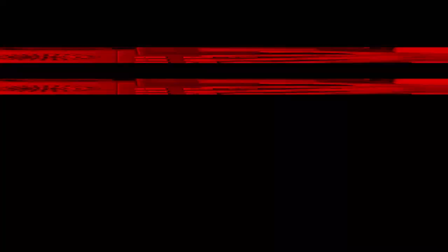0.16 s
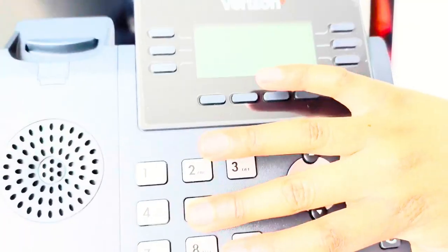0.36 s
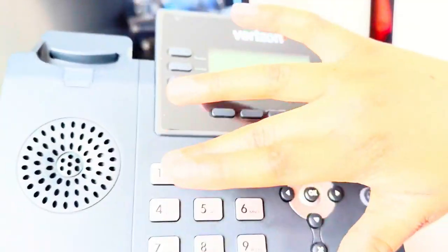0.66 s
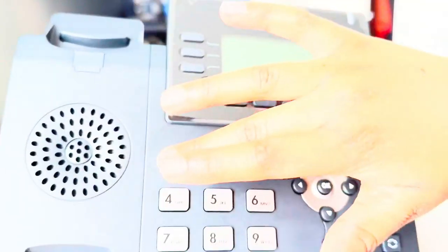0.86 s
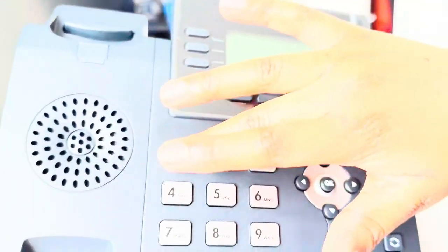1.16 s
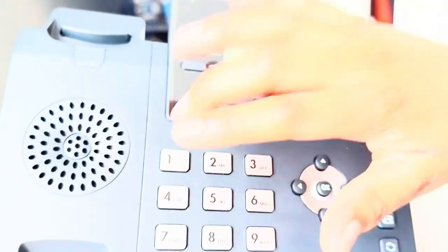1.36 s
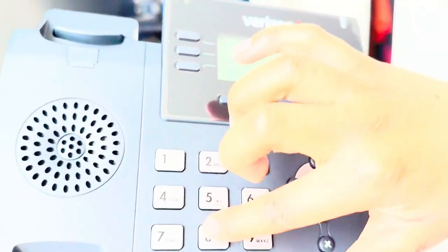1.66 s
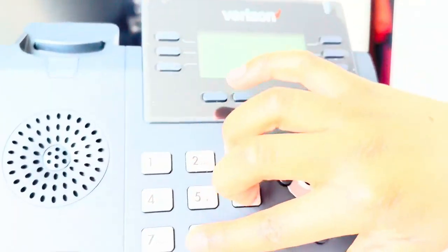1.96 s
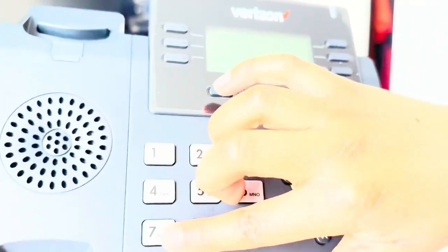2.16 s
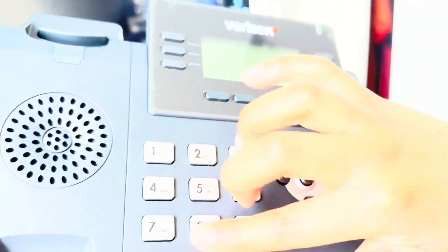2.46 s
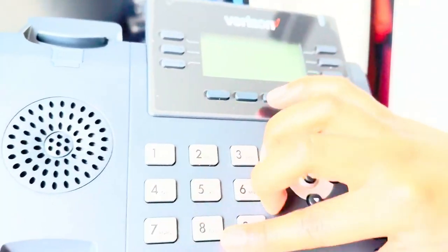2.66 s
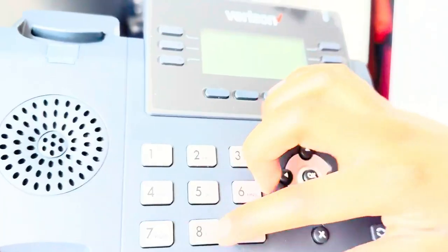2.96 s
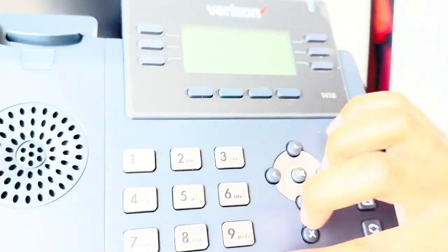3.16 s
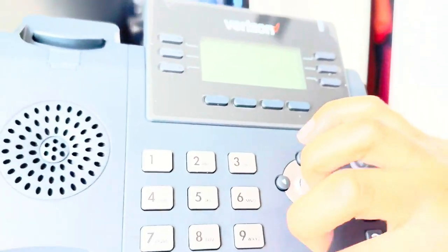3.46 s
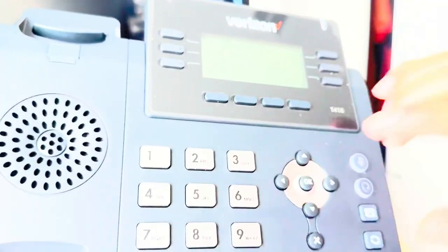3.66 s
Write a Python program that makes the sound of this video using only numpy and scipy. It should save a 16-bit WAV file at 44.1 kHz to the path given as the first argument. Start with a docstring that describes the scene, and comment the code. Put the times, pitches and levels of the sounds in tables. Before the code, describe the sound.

Close stereo pickup of phone buttons clicking irregularly indoors, hollow presses mixed with crisp releases and faint ticks; after a quieter gap, a stiff key clacks loudly and only low background noise remains.

```python
"""In a small room, plastic keys of a desk phone are pressed and let go close to the microphones.
A press is a dull knock: damped modes of a key cap and the hollow case, reversed as the key hits its stop.
A release is a bright snap: a short scrape, then filtered noise bursts with the key's own modes.
Near the end one stiff key clacks loudly. Faint ticks, soft low thuds and the rub of fingertips come between,
and faint noise with a drifting midrange lies underneath with mains hum."""
import sys
import numpy as np
from scipy import signal
from scipy.fft import rfft, irfft
from scipy.io import wavfile

SR = 44100
rng = np.random.default_rng(int(sys.argv[2]) if len(sys.argv) > 2 else 0)


def unload_wav(signal):
    """Save mono or channel-first audio to the path in sys.argv[1] as 16-bit WAV at rate SR, clipped to [-1, 1]."""
    wavfile.write(
        sys.argv[1],
        SR,
        np.round(np.clip(np.atleast_2d(signal).T, -1, 1) * 32767).astype(np.int16),
    )


N = 167580
T = np.arange(int(0.25 * SR)) / SR  # time axis of one short sound [s]
RISE_S, PRESS_RISE_S, CASE_RISE_S = 0.00059, 0.00019, 0.0039


def amp(db):
    """Logarithmic level: decibels to an amplitude gain."""
    return 10 ** (np.asarray(db) / 20)


def read(points, hz):
    """Logarithmic pitch: a curve's value at hz, interpolated over log frequency."""
    f, value = np.transpose(points)
    return np.interp(np.log(hz + 1), np.log(f + 1), value)


def sides(db):
    """Interchannel level difference: left and right gains that share it equally."""
    return amp(np.array([[0.5], [-0.5]]) * db)


def unit(x):
    """Energy normalisation: scales a short sound to the energy of 10 ms at level 1."""
    energy = np.sum(x ** 2, -1, keepdims=True)
    return x / np.sqrt(energy / (SR / 100) + 1e-20)


def add(mix, s, sound):
    """Superposition: mixes a sound in at time s."""
    part = mix[:, max(round(s * SR), 0):][:, :sound.shape[1]]
    part += sound[:, :part.shape[1]]


def coloured(x, points):
    """Linear filtering: weights the spectrum by a (frequency [Hz], level [dB]) curve."""
    return irfft(rfft(x) * amp(read(points, np.fft.rfftfreq(N, 1 / SR))), N)


def mode(hz, t60, rise, lag):
    """Damped resonance: a decaying sine whose right side lags in phase [rad]."""
    envelope = (1 - np.exp(-T / rise)) * amp(-60 * T / t60)
    return envelope * np.sin(2 * np.pi * hz * T - np.array([[0], [lag]]))


# Spectrum of the background noise, relative: (frequency [Hz], density [dB per Hz])
HISS_SPECTRUM = [(15, -45), (25, -13.5), (59, -2), (92, -3), (123, -4.5), (170, -3), (489, -11), (962, -19),
                 (1400, -12.5), (2610, -11), (3920, -17), (6900, -9), (8000, -22.5), (9300, -33.5),
                 (11500, -38), (14500, -38.5), (16000, -47)]
# Its balance: (frequency [Hz], left-right difference [dB])
HISS_BALANCE = [(60, -0.5), (180, -0.5), (550, -1.5), (1650, -1), (4970, 14.5), (15000, 2)]
# Its likeness between the sides: (frequency [Hz], correlation [0-1])
HISS_LIKENESS = [(60, 0.72), (300, 0.75), (1500, 0.11), (6000, 0.071)]
# Drift of the background's midrange: (time [s], relative level [dB])
MIDRANGE_DRIFT = [(0, 16), (.25, 1.5), (0.579, 3.5), (0.679, -4.5), (0.95, 7), (1.339, 10.5), (1.459, -6),
                  (1.88, 6), (2.031, -6), (2.251, 6), (2.38, -18.5), (2.66, -0.5), (2.919, 0), (3.08, -13),
                  (3.299, 0.5), (3.751, 3)]
HISS_DB, HUM_DB, HUM_HZ = -66.5, -81.5, 120  # both levels are RMS
RUMBLE_HZ, RUMBLE_SHARE = 89.2, 0.79  # mainly below this pitch, rumble follows a share of the drift


def background(mid_hz=800, mid_octaves=0.94):
    """Partly coherent noise: hiss and room rumble with a drifting midrange, plus mains hum."""
    frames, hz = N // 512 + 5, np.fft.rfftfreq(2048, 1 / SR)
    a, b, c, d = rng.standard_normal((frames, len(hz), 4)).T
    left, other = a + 1j * b, c + 1j * d
    same = read(HISS_LIKENESS, hz)[:, None]
    z = np.array([left, same * left + np.sqrt(1 - same ** 2) * other])

    drift = np.interp(np.arange(frames) * 512 / SR, *np.transpose(MIDRANGE_DRIFT))
    share = np.exp(-0.5 * (np.log2((hz + 1) / mid_hz) / mid_octaves) ** 2)
    share += RUMBLE_SHARE / (1 + (hz / RUMBLE_HZ) ** 2)
    z *= amp(read(HISS_SPECTRUM, hz)[:, None] + share[:, None] * drift)
    z *= sides(read(HISS_BALANCE, hz))[:, :, None]
    hiss = signal.istft(z, nperseg=2048, noverlap=1536)[1][:, :N]
    hum = np.sqrt(2) * np.sin(2 * np.pi * HUM_HZ * np.arange(N) / SR)
    return amp(HISS_DB) * hiss / hiss.std() + amp(HUM_DB) * hum


# Edges of six noise bands: (frequency [Hz])
BAND_EDGES = [400, 700, 1400, 2800, 5600, 10000, 16500]
# Per band: (time to die by 60 dB [s])
BAND_DECAY = [0.22, 0.077, 0.037, 0.017, 0.017, 0.0053]
# Per band: (left-right difference added to the sound's own [dB])
BAND_BALANCE = [4, -0.5, 0.5, 3.5, 5, -6.5]
# Per band: (left-right correlation before filtering [0-1])
BAND_LIKENESS = [0.95, 0.45, 0.44, 0.51, 0.59, 0.16]


def plastic(levels_db, rise, pan_db):
    """High modal density: many damped modes of plastic parts merge into noise, band by band."""
    out = 0
    for k, db in enumerate(levels_db):
        common, *separate = rng.standard_normal((3, len(T)))
        same = BAND_LIKENESS[k]
        noise = np.sqrt(same) * common + np.sqrt(1 - same) * np.array(separate)
        burst = noise * np.minimum(T / rise, 1) ** 2 * amp(-60 * T / BAND_DECAY[k])
        band = signal.butter(3, BAND_EDGES[k:k + 2], "band", fs=SR, output="sos")
        out = out + amp(db) * unit(signal.sosfilt(band, burst)) * sides(pan_db + BAND_BALANCE[k])
    return out


# Faint ticks; the first is the end of a click already sounding at the start:
# (time [s], level before the band colour [dB])
FAINT_TICKS = [(.003, -60), (1.932, -63.5), (2.288, -67), (2.595, -59), (3.156, -75.5), (3.251, -66.5)]
# Colour of a faint tick, per band: (level [dB])
TICK_COLOUR = [-8, -5, 1, -10, -30.5, -31]


def faint_tick(db):
    """Banded noise burst: a faint tick of plastic with a slow rise and little treble."""
    return plastic(db + np.array(TICK_COLOUR), 0.0031, 2)


# How well the phone's shell radiates: (frequency [Hz], level [dB])
SHELL_RADIATION = [(320, -7.5), (500, 0.5), (820, -2.5), (1000, -1), (1230, 4.5), (1480, -2.5), (1900, 0.5),
                   (2550, -6), (3100, -1.5), (4200, -5), (7000, 0)]


def shell(x):
    """Radiation efficiency: the shell passes some pitches to the air better than others."""
    return coloured(x, SHELL_RADIATION)


# Reverberation time of the room: (frequency [Hz], time to die by 60 dB [s])
ROOM_DECAY = [(250, 0.5), (550, 0.5), (1200, 0.41), (3000, 0.4), (7000, 0.39), (15000, 0.27)]
# Colour of the room: (frequency [Hz], level [dB])
ROOM_COLOUR = [(250, -3.5), (450, -16.5), (640, -12.5), (1200, -9.5), (3000, -6.5), (7000, -5.5),
               (11000, -13), (14000, -16.5)]


def room(x, delay_s=0.00038, build_s=0.003):
    """Diffuse reverberation: dense reflections of random phase, each pitch dying at its own speed."""
    t = np.arange(SR // 2) / SR
    hz, at, z = signal.stft(rng.standard_normal((2, len(t))), SR, nperseg=512)
    t60 = read(ROOM_DECAY, hz)[:, None]
    z = z / abs(z) * z.std()  # keep only the random phases
    z = z * amp(read(ROOM_COLOUR, hz)[:, None] - 60 * at / t60)
    z = z * np.sqrt(2 * np.log(1000) / (t60 * SR))  # equal energy whatever the decay
    tail = signal.istft(z, SR, nperseg=512)[1][:, :len(t)]
    tail = tail * np.clip((t - delay_s) / build_s, 0, 1)
    return signal.fftconvolve(x, tail, axes=1)[:, :N]


# Modes of the hollow case: (pitch ratio to the case pitch [1], relative level [dB],
# time to die by 60 dB [s], phase lag of the right side [rad])
CASE_MODES = [(0.93, -6, 0.026, 1), (1.02, -0.5, 0.018, .5), (1.419, -11, 0.025, 1)]


def case(hz):
    """Modal superposition: the hollow case rings in a few modes after a blow."""
    return unit(sum(amp(db) * mode(hz * ratio, t60, CASE_RISE_S, lag)
                    for ratio, db, t60, lag in CASE_MODES))


HOLLOW_HZ, HOLLOW_WIDTH = 537, 0.091  # centre, and half-width as a share of it
HOLLOW_T60, HOLLOW_RISE_S = 0.34, 0.006


def hollow(db):
    """Modal clustering: many close low modes linger together after a knock into the case."""
    noise = rng.standard_normal(len(T))
    burst = noise * (1 - np.exp(-T / HOLLOW_RISE_S)) * amp(-60 * T / HOLLOW_T60)
    edges = [HOLLOW_HZ / (1 + HOLLOW_WIDTH), HOLLOW_HZ * (1 + HOLLOW_WIDTH)]
    band = signal.butter(2, edges, "band", fs=SR, output="sos")
    return amp(db) * unit(signal.sosfilt(band, burst))


# Soft presses: (time [s], reference level of case and hollow ring [dB], case pitch [Hz], key pitch [Hz],
# key knock [dB], reference level of the edge [dB], reference level of the tick [dB])
KEY_PRESSES = [(0.1094, -37.5, 513, 950, -44, -60.5, -82), (0.7813, -42, 542, 887, -39, -57.5, -53.5),
               (1.06, -41, 540, 930, -40, -50, -46), (1.7032, -39, 521, 793, -42, -59, -49),
               (2.1180, -42.5, 519, 860, -46, -72, -66), (3.27, -52, 544, 883, -54, -65, -53)]
# Modes of a key cap knocked through its rubber dome:
# (pitch ratio to the key pitch [1], relative level [dB], time to die by 60 dB [s])
KNOCK_MODES = [(1, 22.5, 0.010), (1.27, -8.5, 0.0075)]
BOTTOM_S, BOTTOM_DB = 0.004747, 4.5  # delay of the stop, and its kick on the case relative to the first


def press(level_db, hz, key_hz, knock_db, edge_db, tick_db, body_db=-3, stop_knock_db=-11, pan_db=4):
    """Impulse reversal: the rubber dome gives way, then the stop kicks the case the other way."""
    cap = unit(sum(amp(db) * mode(key_hz * ratio, t60, PRESS_RISE_S, 0.43)
                   for ratio, db, t60 in KNOCK_MODES))
    cap = amp(knock_db) * cap * sides(pan_db)
    body = amp(level_db + body_db) * case(hz)
    bands = [knock_db - 17, knock_db - 13.5, edge_db + 2.5, tick_db - 11.5]  # lowest four bands
    out = body + cap + plastic(bands, PRESS_RISE_S, 2.0)
    add(out, BOTTOM_S, -amp(BOTTOM_DB) * body - amp(stop_knock_db) * cap)
    return out


SCRAPE_DB, SCRAPE_S = -19, 0.0028  # scrape relative to the snap, and its lead


def snap(levels_db, pan_db, ring):
    """Friction, then impact: a key scrapes along its guide, snaps against the frame and rings."""
    out = amp(SCRAPE_DB) * plastic(levels_db, RISE_S, pan_db)
    add(out, SCRAPE_S, plastic(levels_db, RISE_S, pan_db) + ring)
    return out


# Releases: (time of the snap [s], level in each of six bands before the colour [dB] x 6,
# main ring [Hz], its level before the ring gain [dB], its time to die by 60 dB [s],
# second ring [Hz], its level before the ring gain [dB], left-right difference [dB])
KEY_RELEASES = [(0.303, -48, -47.5, -50, -51.5, -60, -34.5, 1127, -51, 0.01, 1980, -48, 3.1),
                (0.385, -42.5, -41, -50, -48, -56.5, -49, 815, -43, 0.025, 1860, -53, 2.5),
                (0.9285, -54, -48.5, -59, -53, -60.5, -48, 2380, -44, 0.021, 3990, -53, 3.9),
                (1.1785, -57, -54, -54.5, -51.5, -60, -42.5, 1890, -51.5, 0.027, 4480, -56.5, 0.65),
                (1.1951, -53, -50.5, -53.5, -62.5, -58, -62, 3900, -46.5, 0.0045, 1900, -57.5, 0.46),
                (1.8095, -47, -48, -55, -46.5, -48.5, -37, 3020, -43, .007, 1090, -50.5, 1.9),
                (2.245, -55.5, -53, -54, -46, -56, -40.5, 6510, -46, 0.0065, 1868, -57, 5.8),
                (2.8337, -60.5, -52.5, -54, -49, -61.5, -52, 1216, -54, 0.066, 3240, -55, 4.5)]
# Colour of the plastic in a release, per band: (level [dB])
RELEASE_COLOUR = [-8.5, -5, 5.5, 0.5, 0, -19.5]
CASE_HZ = 527


def release(levels_db, ring_hz, ring_db, ring_t60, second_hz, second_db, pan_db,
            body_db=-4, second_t60=0.015, lag=0.74):
    """Elastic recoil: a key springs back, ringing two of its own modes and the case."""
    ring = amp(ring_db) * unit(mode(ring_hz, ring_t60, RISE_S, lag))
    ring += amp(second_db) * unit(mode(second_hz, second_t60, RISE_S, lag))
    body = amp(levels_db[0] + body_db) * case(CASE_HZ)
    return snap(levels_db + np.array(RELEASE_COLOUR), pan_db, ring * sides(pan_db) + body)


# Soft low thuds, with three presses and one release: (time [s], level [dB])
LOW_THUDS = [(0.782, -58.5), (1.062, -56), (1.18, -54), (1.707, -55.5)]
THUD_HZ, THUD_T60 = 296, 0.12


def thuds():
    """Damped low resonance: a soft thud at one low pitch."""
    out = np.zeros((2, N))
    for s, db in LOW_THUDS:
        add(out, s, amp(db) * unit(mode(THUD_HZ, THUD_T60, CASE_RISE_S, 0.35)))
    return out


# Fingertips slide over the plastic: (time [s], length [s], pitch [Hz], level at the middle [dB])
FINGER_RUBS = [(2.69, 0.25, 3070, -74), (3.08, 0.15, 1720, -74), (3.633, 0.094, 1310, -71)]


def rubs(width=0.059):
    """Friction noise: skin slides on plastic with a thin narrow-band whisper."""
    out = np.zeros((2, N))
    for s, length, hz, db in FINGER_RUBS:
        band = signal.butter(1, [hz / (1 + width), hz * (1 + width)], "band", fs=SR, output="sos")
        z = signal.sosfilt(band, rng.standard_normal((2, len(T))))
        swell = np.sin(np.pi * np.minimum(T / length, 1))
        add(out, s, amp(db) * z / z.std() * swell)
    return out


# The stiff key's clack: (time [s], left-right difference [dB])
STIFF_CLACK = (3.3652, 1.4)
# Its plastic, per band: (level [dB])
CLACK_BANDS = [-41, -40, -31, -25, -26.5, -28.5]
# Its low modes: (frequency [Hz], level [dB], time to die by 60 dB [s])
CLACK_LOW = [(422, -26.5, 0.024), (492, -28.5, 0.013), (528, -25, 0.037), (734, -32, .03)]
# Its high modes: (frequency [Hz], level before the ring gain [dB])
CLACK_HIGH = [(1270, -32.5), (2920, -28), (3570, -44), (5250, -32), (7150, -40.5), (8710, -43.5),
              (13500, -45)]


def clack(pan_db, ring_db, rise_cycles=0.79, ring_t60=0.008, hollow_db=-48, lag_per_khz=0.45, low_lag=1):
    """Modal build-up: the stiff key shakes the phone; low modes swell more slowly than high ones."""
    low = sum(amp(db) * unit(mode(hz, t60, rise_cycles / hz, low_lag)) for hz, db, t60 in CLACK_LOW)
    high = sum(amp(db + ring_db) * unit(mode(hz, ring_t60, RISE_S, lag_per_khz * hz / 1e3))
               for hz, db in CLACK_HIGH)
    return snap(CLACK_BANDS, pan_db, low + high * sides(pan_db) + hollow(hollow_db))


LOW_CUT_HZ = 367  # the small case radiates little bass


def keys(ring_db, linger_db=-14, order=5):
    """Superposition: all key sounds and faint ticks, the keys' own rings changed by a gain of ring_db."""
    out = np.zeros((2, N))
    for s, db in FAINT_TICKS:
        add(out, s, faint_tick(db))
    for s, db, *row in KEY_PRESSES:
        add(out, s, press(db, *row) + hollow(db + linger_db))
    for s, *bands, hz, db, t60, second_hz, second_db, pan in KEY_RELEASES:
        sound = release(bands, hz, db + ring_db, t60, second_hz, second_db + ring_db, pan)
        add(out, s - SCRAPE_S, sound)
    s, pan = STIFF_CLACK
    add(out, s - SCRAPE_S, clack(pan, ring_db))
    return signal.sosfilt(signal.butter(order, LOW_CUT_HZ, "high", fs=SR, output="sos"), out)


def scene(count=2, near_ring_db=0.5, echo_ring_db=-4, echo_db=0.5):
    """Direct and reverberant fields: close sound with clear rings, and an echo with weaker rings."""
    near = shell(keys(near_ring_db)) + thuds()
    echo = 0
    for k in range(count):  # two noise draws, one side-swapped, even out random ripple
        source = shell(keys(echo_ring_db)) + thuds()
        echo = echo + room(source[::(-1) ** k])
    return near + amp(echo_db) * echo / np.sqrt(count) + rubs() + background()


# Colour of the microphones' treble: (frequency [Hz], level [dB])
MIC_TREBLE = [(8500, 0), (11200, -8.5), (13000, 4.5), (14600, 8), (16000, -4.5)]
EDGE_HZ = 16300


def record(dry):
    """Transducer response: the microphones' treble colour, then the band limit."""
    low_pass = signal.firwin(255, EDGE_HZ, window=("kaiser", 8), fs=SR)
    return signal.oaconvolve(coloured(dry, MIC_TREBLE), low_pass[None], "same")


dry = scene()
out = record(dry)
unload_wav(out)
```